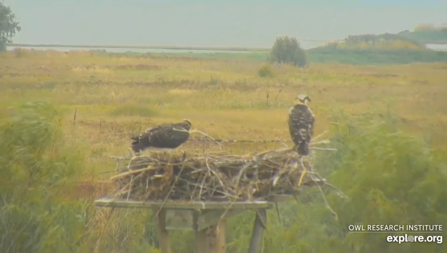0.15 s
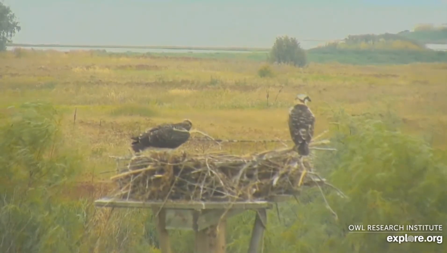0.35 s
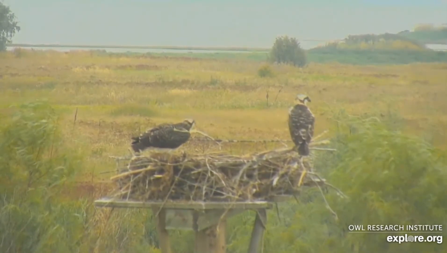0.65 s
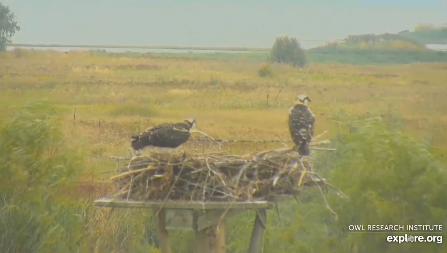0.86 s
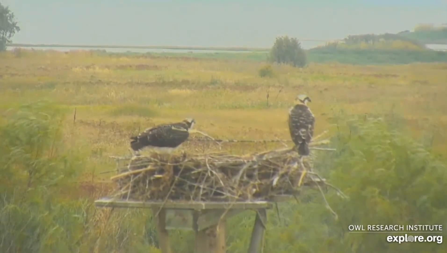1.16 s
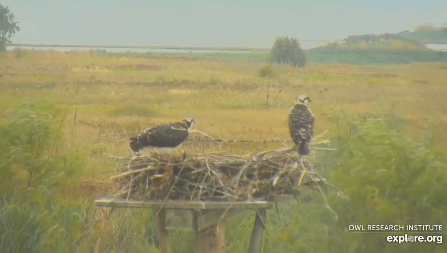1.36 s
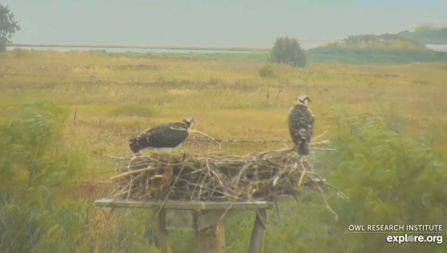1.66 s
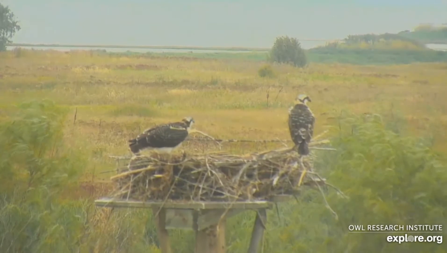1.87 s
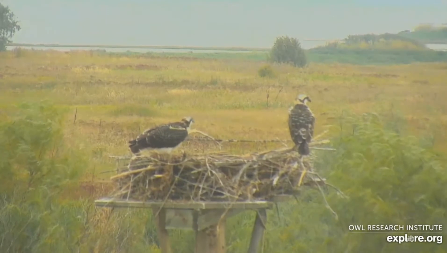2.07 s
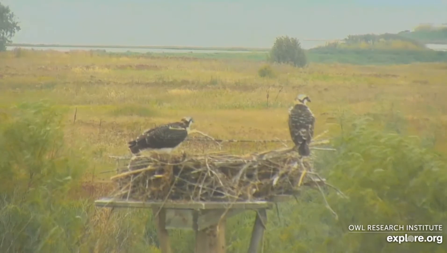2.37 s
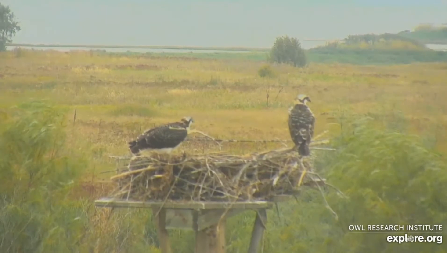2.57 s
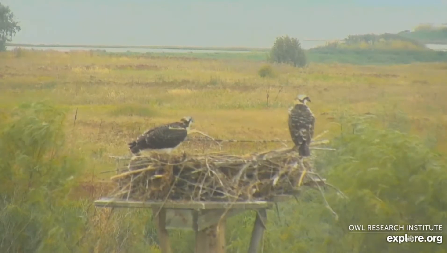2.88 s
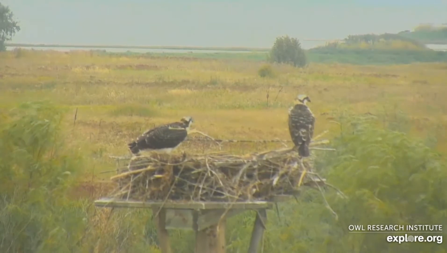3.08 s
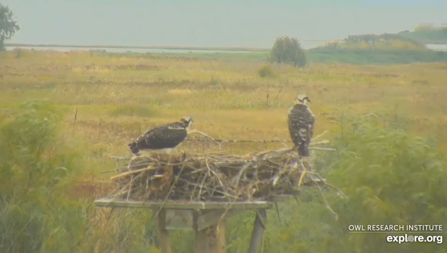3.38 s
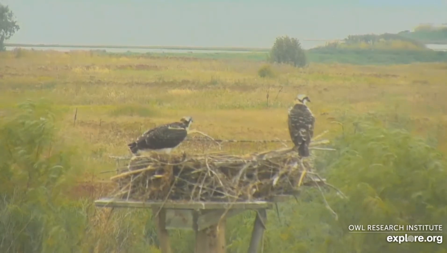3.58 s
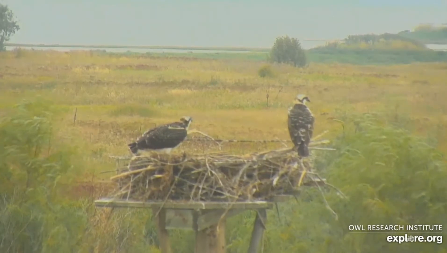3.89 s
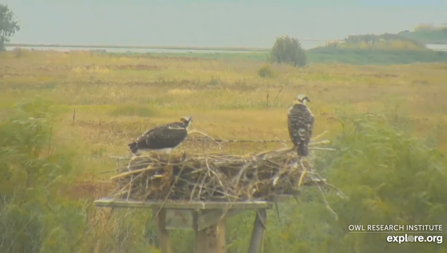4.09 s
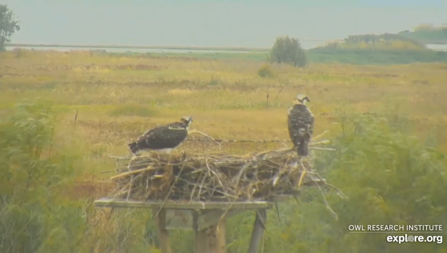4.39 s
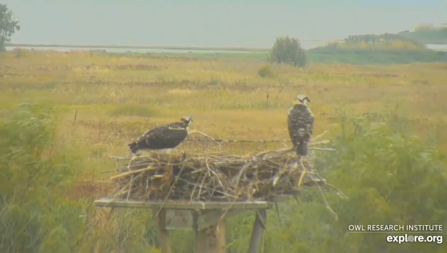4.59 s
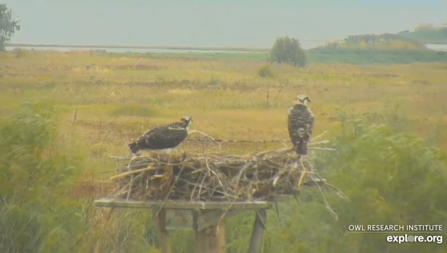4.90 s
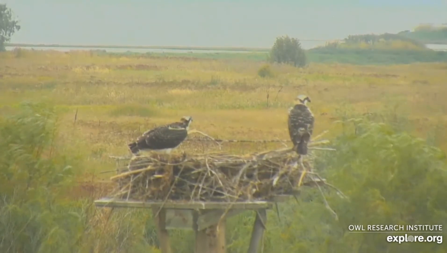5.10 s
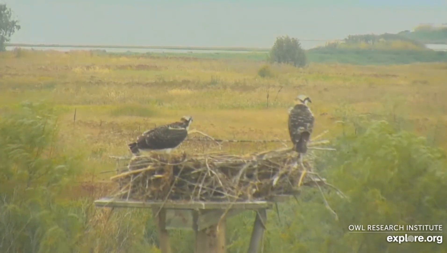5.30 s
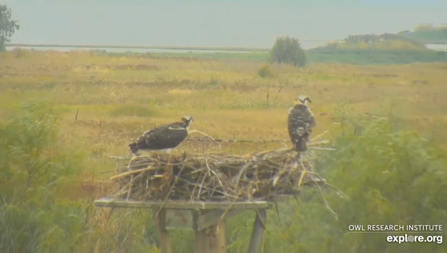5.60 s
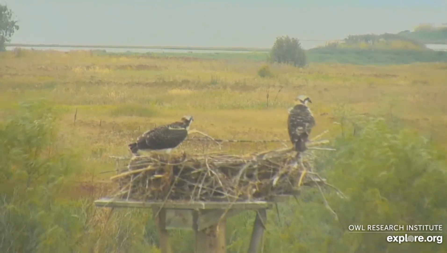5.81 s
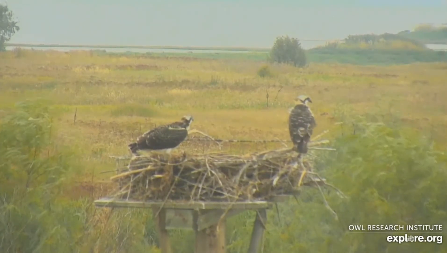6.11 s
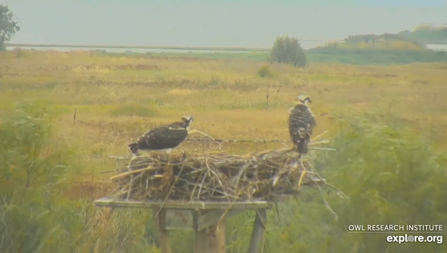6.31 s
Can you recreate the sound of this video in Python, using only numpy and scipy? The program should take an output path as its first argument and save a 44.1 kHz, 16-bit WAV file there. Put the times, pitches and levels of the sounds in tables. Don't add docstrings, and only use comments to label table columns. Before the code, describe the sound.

Birds at an open marsh nest trade brief gliding whistles over soft wind buffeting, grass hiss and a deep, slowly swelling engine hum.

```python
import sys
import numpy as np
from scipy import signal
from scipy.fft import rfft, irfft
from scipy.io import wavfile
from scipy.ndimage import uniform_filter1d

SR = 44100
rng = np.random.default_rng(int(sys.argv[2]) if len(sys.argv) > 2 else 0)


def int16_out(signal):
    q = np.round(np.clip(np.atleast_2d(signal).T, -1, 1) * 32767)
    wavfile.write(sys.argv[1], SR, q.astype(np.int16))


def volts_from_db(level):
    exponent = np.asarray(level, float) / 20
    return 10 ** exponent


N = 284445
TIME = np.arange(N) / SR


# (lag [ms], level [dB])
ECHOES = [(9, -21), (17, -22), (31, -25), (64, -25)]
# (multiple [1], level [dB])
OVERTONES = [(2, -31), (3, -34.5)]


def sing(shape, calls, rough=.1, split_hz=0):
    out = np.zeros(N)
    ms, hz, db = np.transpose(shape)
    ms = np.maximum.accumulate(ms)
    for s, call_db, pitch, bright_db_per_khz, stretch in calls:
        echo_db = .33 * max(-29 - call_db, 0)
        t = np.arange(ms[0], ms[-1], 1000 / SR / stretch)
        f = uniform_filter1d(np.interp(t, ms, hz) * pitch, size=54)
        flutter = uniform_filter1d(rng.standard_normal((2, len(t))), 40, axis=1) * np.sqrt(40)
        phase = 2 * np.pi * np.cumsum(f * (1 + .045 * rough * flutter[0])) / SR
        tone = np.sin(phase)
        for k, d in OVERTONES:
            tone = tone + volts_from_db(d) * np.sin(k * phase) * (k * f < SR / 2)
        level_db = call_db + np.interp(t, ms, db) + bright_db_per_khz * (f - 3500) / 1000
        gain = volts_from_db(level_db) * signal.windows.tukey(len(t), .06)
        beat = np.cos(np.pi * split_hz * np.arange(len(t)) / SR)
        chirp = np.sqrt(2) * tone * gain * (1 + rough * flutter[1]) * beat
        start = s + ms[0] * stretch / 1000
        add(out, chirp, start)
        for lag_ms, d in ECHOES:
            add(out, chirp * volts_from_db(d + echo_db), start + lag_ms / 1000)
        tail_t = np.arange(SR // 8) / SR
        tail = rng.standard_normal(len(tail_t)) * np.exp(-tail_t / .045)
        add(out, signal.fftconvolve(chirp, tail) * volts_from_db(-45.5 + echo_db), start)
    return out


def quaver(shape, count):
    swing_hz, swing_ms, fade_db = (3380, 2680), 4.9, -3
    ms, _, db = shape[-1]
    swings = [(ms + k * swing_ms, swing_hz[1 - k % 2], db + k * fade_db) for k in range(1, count + 1)]
    return list(shape) + swings


def openings(calls):
    return [(s, db, pitch, bright, 1) for s, db, pitch, bright, _ in calls]


def closings(calls, after_ms):
    return [(s + after_ms / 1000, arch_db, pitch, 0, 1) for s, _, pitch, _, arch_db in calls]


# (time [ms], pitch [Hz], level [dB])
LEAD_IN = [(-28, 4900, -30), (-24, 5000, -17), (-10, 5350, -14), (-2, 5800, -12), (2, 6000, -30)]


def lead_in(calls):
    return sing(LEAD_IN, openings(calls), rough=.35, split_hz=680)


# (time [ms], pitch [Hz], level [dB])
WARBLE = [(0, 3450, -17), (7, 4560, -4.5), (14, 4860, -.3), (19, 4480, -2.5), (26.5, 4880, -4),
          (33, 3640, -1.5), (43, 3600, -.2), (48.5, 4650, -7), (56, 2950, -17)]
# (time [ms], pitch [Hz], level [dB])
ARCH = [(.1, 3230, -24), (1.8, 3010, -11), (8.64, 3270, 0), (16.6, 3660, -7.5), (23.5, 3700, -6.5),
        (29.05, 3150, -8.5), (34.43, 2980, -4.5)]
# (time [s], level [dB], pitch factor [1], brightness [dB per kHz], closing arch level [dB])
NEAR_CALLS = [
    (.1078, -27.5, .995, 0, -28),
    (1.3303, -27.5, 1, 0, -28),
    (2.4631, -30, .995, 0, -30),
    (3.7881, -29.5, .987, 0, -30.5),
    (4.8308, -26, 1, 0, -27),
    (6.0230, -28, 1, 1, -31),
]


def near_sparrow():
    warble = sing(WARBLE, openings(NEAR_CALLS), rough=.16)
    arch = sing(quaver(ARCH, count=6), closings(NEAR_CALLS, after_ms=55.9), rough=.18)
    return lead_in(NEAR_CALLS) + warble + arch


# (time [ms], pitch [Hz], level [dB])
SHARP = [(-2, 3300, -22), (4.5, 4180, -3), (10, 5170, -4), (17, 4950, -4), (23, 5400, -7), (34.5, 3620, -2),
         (41, 4360, -4), (45, 3800, -8), (50, 3050, -12)]
# (time [ms], pitch [Hz], level [dB])
SHARP_ARCH = [(0.099, 2600, -16), (5.4, 3330, -7), (18.6, 3680, 0.3), (30.6, 4010, -6.5), (38.3, 3500, -6),
              (47, 3300, -14)]
# (time [s], level [dB], pitch factor [1], brightness [dB per kHz], closing arch level [dB])
SHARP_CALLS = [
    (.7180, -32, 1, 0, -36),
    (2.6175, -37, 1, -5, -37.5),
    (4.0330, -42, 1.02, -1, -42),
    (5.6485, -44, 1.01, 1, -58),
]


def sharp_sparrow():
    warble = sing(SHARP, openings(SHARP_CALLS), rough=.18)
    arch = sing(SHARP_ARCH, closings(SHARP_CALLS, after_ms=48.7), rough=.18)
    return lead_in(SHARP_CALLS) + warble + arch


# (time [ms], pitch [Hz], level [dB])
HOARSE_LOW = [(0, 3500, -10), (15, 4250, -1), (25, 3550, -2), (42, 3400, -2), (58, 2950, -5),
              (64, 3000, -5)]
HOARSE_HIGH = [(-14, 6200, -14), (-2, 5450, -11), (8, 4950, -9), (17, 4950, -3), (25, 4150, -4),
               (50, 4080, -7), (62, 3900, -22), (94, 3850, -9), (104, 3600, -22)]
HOARSE_ARCH = [(64, 3000, -5), (76, 3250, 0), (84, 3950, -1), (92, 3100, -1), (105, 2850, -3),
               (125, 2720, -7), (132, 2700, -25)]
# (time [s], level [dB], pitch factor [1], brightness [dB per kHz], length factor [1])
HOARSE_CALLS = [
    (3.246, -37, .985, -3, .91),
    (5.394, -37, 1, 0, .97),
]


def hoarse_sparrow():
    low = sing(HOARSE_LOW, HOARSE_CALLS, rough=.5, split_hz=80)
    arch = sing(HOARSE_ARCH, HOARSE_CALLS, rough=.5, split_hz=80)
    return low + arch + sing(HOARSE_HIGH, HOARSE_CALLS, rough=.6)


# (time [ms], pitch [Hz], level [dB])
FAR = [(-55, 3400, -24), (-44, 4750, -19), (-30, 4400, -20), (-25, 4400, -13), (-21, 3400, -16),
       (-16, 3300, -24), (-11, 3600, -10), (-6, 3000, -18)]
# (time [ms], pitch [Hz], level [dB])
FAR_ARCH = [(-7, 3000, -15), (1.6, 2800, -7), (6.5, 3480, -1), (22.5, 3330, -3), (32, 2800, -4.5),
            (36.5, 2600, -3.5)]
# (time [s], level [dB], pitch factor [1], brightness [dB per kHz], length factor [1])
FAR_CALLS = [
    (1.025, -36.5, 1.001, 4, 1.04),
    (2.968, -41, 0.97, 7, 1.001),
    (4.266, -46, .97, 0, 1.001),
    (5.14, -41, 1, 7, 1.1),
]


def far_sparrow():
    return sing(FAR, FAR_CALLS, rough=.55) + sing(quaver(FAR_ARCH, count=4), FAR_CALLS, rough=.25)


# (time [ms], pitch [Hz], level [dB])
SLIDE = [(0, 2650, -14), (8, 2750, -3), (26, 3080, 0), (34, 3120, -14)]
# (time [s], level [dB], pitch factor [1], length factor [1])
SLIDE_CALLS = [
    (.697, -43, 2.03, .6),
    (.905, -54, 1.6, .8),
    (1.735, -50, 1.12, .9),
    (2.925, -46, 1, 1),
    (3.008, -48, 1.1, .4),
    (3.113, -44.5, 1, 1.05),
    (5.1, -41, 1.36, .4),
    (5.105, -53, 1.75, .8),
    (5.118, -43, 1.14, 1),
]


def sliding_notes():
    calls = [(s, db, pitch, 0, stretch) for s, db, pitch, stretch in SLIDE_CALLS]
    return sing(SLIDE, calls, rough=.21)


# (time [s], pitch [Hz], level [dB])
PEEP = [
    (.12, 1970, -75),
    (.15, 1980, -58),
    (.27, 1975, -61),
    (.32, 1970, -75),
]


def peep():
    hz, db = curves(PEEP)
    return np.sqrt(2) * volts_from_db(db) * np.sin(2 * np.pi * np.cumsum(hz) / SR)


def sparrows():
    near = near_sparrow() + sharp_sparrow()
    return near + hoarse_sparrow() + far_sparrow() + sliding_notes() + peep()


# (start [s], end [s], start of one stroke [s], stroke rate [Hz], level [dB])
TRILLS = [
    (0, .68, .413, 40.8, -54),
    (1.42, 2.4, 1.6, 39.05, -48.5),
]


def cricket():
    out = 0
    for start, end, stroke_s, rate, db in TRILLS:
        stroke = (TIME - stroke_s) * rate % 1
        hz = 4160 - 720 * stroke
        swell = np.sin(np.pi * np.clip((TIME - start) / (end - start), 0, 1) ** .6) ** .6
        pulse = np.sin(np.pi * np.clip(stroke / .55, 0, 1))
        gain = swell * pulse * volts_from_db(db + 1.2 * walk(30))
        out = out + gain * np.sin(2 * np.pi * np.cumsum(hz) / SR)
    return out


# (time [s], level [dB], pitch [Hz])
TICKS = [
    (.833, -44, 4200),
    (1.668, -36, 7000),
    (2.93, -44, 7000),
    (4.728, -42, 11500),
]


def twigs():
    out, t = np.zeros(N), np.arange(60) / SR
    for s, db, hz in TICKS:
        add(out, volts_from_db(db) * np.sin(2 * np.pi * hz * t) * np.exp(-t / .0002), s)
    return out


# (time [s], thump level [dB], half length [s], sharpness [dB])
GUST = [(0.0, -42.5, 0.069, -9), (0.248, -34.5, 0.041, -20), (0.584, -39.5, 0.022, 0),
        (0.733, -35, 0.12, -26), (0.947, -40, 0.092, -22), (1.085, -34.5, 0.13, -23),
        (1.22, -34.5, 0.1, -17), (1.386, -35, .05, -15), (1.534, -35, 0.067, -23),
        (1.719, -29.5, 0.07, -18), (1.932, -41, 0.06, -17), (2.338, -33, 0.041, -7.5),
        (2.41, -38, 0.063, -2.5), (2.57, -36, 0.079, -6), (2.673, -32.5, 0.078, -13), (3.016, -40, 0.2, -8),
        (3.17, -35.5, .03, -2), (3.292, -46, 0.033, -5), (3.52, -40, 0.091, -14), (3.694, -44.5, 0.13, -13),
        (3.99, -40, 0.028, -12), (4.22, -48, .05, 2), (4.68, -46.5, 0.17, -1), (4.93, -37.5, 0.026, -11),
        (5.05, -46, .05, 0), (5.47, -48, .06, -10), (5.73, -53, 0.054, -7), (6.0, -44.5, 0.11, 3),
        (6.296, -58, 0.035, -4), (6.45, -48, 0.034, -13)]
# (frequency [Hz], level [dB per Hz])
BUFFET = [(22, -34), (40, -18), (62, -7.5), (90, -2), (130, 1), (170, -1), (230, -6), (330, -17),
          (600, -40)]
# (frequency [Hz], level [dB per Hz])
EDGE = [(150, -37), (220, -12.5), (280, -2), (350, -9.5), (500, -40)]


def wind():
    _, db, _, sharp_db = np.transpose(GUST)
    swell = bumps(GUST) ** 2
    lull_db, lull_edge_db = -45 - 1.18 * TIME, -47.5
    thump = np.sqrt(volts_from_db(db) ** 2 @ swell + volts_from_db(lull_db) ** 2)
    sharp = np.sqrt(volts_from_db(db + sharp_db) ** 2 @ swell + volts_from_db(lull_edge_db) ** 2)
    puffs = coloured(BUFFET, 128, 240, flicker_db=1.5, rate=30)
    edge = coloured(EDGE, 197, 400, flicker_db=0.0, rate=14) * volts_from_db(-5.0)
    return (puffs * thump + edge * sharp) * volts_from_db(-1.5 + 1.2 * walk(45))


# (time [s], level [dB])
DRONE = [
    (0.0, -32),
    (1.0, -33),
    (2.3, -33),
    (3.15, -27.5),
    (4.3, -26),
    (5.5, -23.5),
    (6.45, -22),
]
# (time [s], change [dB], half length [s])
FADES = [
    (0.544, -10.5, 0.065),
    (0.814, -7.5, 0.11),
    (1.085, -11, 0.034),
    (1.4, -10, .2),
    (1.613, 1, 0.054),
    (1.837, -7, 0.033),
    (2.02, -2.5, .09),
    (2.417, -4.5, .08),
    (3.383, -2, 0.055),
]
# (multiple [1], level [dB])
DRONE_ORDERS = [(12, -67), (16, -67.5), (22, -68)]


def engine():
    firing_hz = 110.75
    db = curves(DRONE)[0] + np.array(FADES)[:, 1] @ bumps(FADES)
    phase = 2 * np.pi * np.cumsum(firing_hz + .25 * walk(2)) / SR
    upper = sum(volts_from_db(d + 2.0 * walk(3.33)) * np.sin(k * phase) for k, d in DRONE_ORDERS)
    return np.sqrt(2) * (volts_from_db(db + .7 * walk(9)) * np.sin(phase) + upper)


# (frequency [Hz], level [dB per Hz])
ROAR = [(25, -13), (45, -19), (80, 7), (140, 2), (190, -7), (430, 0.5), (620, -2), (870, -4.5),
        (1480, -16.5), (2400, -19.5), (3100, -24), (5000, -64)]
# (time [s], level [dB])
ROAR_LEVEL = [(0.0, -44), (1.2, -43), (2.9, -42), (5.2, -41.5), (5.75, -43), (6.45, -42.5)]
# (frequency [Hz], level [dB per Hz])
HISS = [(710, -40), (1200, -9), (1420, -4.5), (1770, -1.5), (1940, -8), (2230, -7), (2770, -0.5),
        (3660, -2.5), (4630, -1.5), (8620, -10.5), (12200, -22.5), (14700, -26), (15600, -25)]
# (time [s], level [dB])
BREEZE = [(0.0, -59.5), (.77, -57.5), (1.22, -59), (1.51, -58), (2.1, -59.5), (3.0, -56), (3.32, -55.5),
          (3.81, -52.5), (4.44, -54), (5.21, -52.5), (6.45, -52.5)]
# (frequency [Hz], level [dB per Hz])
SELF_NOISE = [(3000, 7.5), (6000, -1), (9000, -5), (12000, -3.5), (14500, -5), (15700, -7)]


def marsh():
    roar_db, hiss_db = curves(ROAR_LEVEL)[0], curves(BREEZE)[0]
    roar = coloured(ROAR, 300, 1500, flicker_db=.5, rate=5) * volts_from_db(roar_db)
    hiss = coloured(HISS, 6000, 10000, flicker_db=.3, rate=6) * volts_from_db(hiss_db - 1.5)
    amplifier = coloured(SELF_NOISE, 10000, 15500, flicker_db=1.0, rate=4.7) * volts_from_db(-66)
    return roar + hiss + amplifier


def curves(table):
    s, *columns = np.transpose(table)
    return [np.interp(TIME, s, c) for c in columns]


def bumps(table):
    s, half_s = np.array(table)[:, [0, 2]].T[..., None]
    return np.exp(-((TIME - s) / half_s) ** 2)


def walk(rate):
    hold = int(SR / rate)
    levels = np.repeat(rng.standard_normal(N // hold + 1), hold)[:N]
    levels = uniform_filter1d(uniform_filter1d(levels, hold), hold)
    return levels / levels.std()


def coloured(spectrum, lo_hz, hi_hz, flicker_db, rate):
    hz = np.maximum(np.arange(N // 2 + 1) * SR / N, 1)
    at, db = np.transpose(spectrum)
    noise = rfft(rng.standard_normal(N)) * volts_from_db(np.interp(np.log(hz), np.log(at), db))
    inside = noise[(hz > lo_hz) & (hz < hi_hz)]
    noise = noise / np.sqrt(2 * np.sum(np.abs(inside) ** 2)) * N
    half_octave = 2 * np.log2(hz)
    out = 0
    for centre in np.arange(np.floor(2 * np.log2(at[0])), 2 * np.log2(at[-1]) + 1):
        share = np.cos(np.pi / 2 * np.clip(half_octave - centre, -1, 1)) ** 2
        out = out + irfft(noise * share, N) * volts_from_db(flicker_db * walk(rate))
    return out


def add(out, x, s):
    i = int(s * SR)
    out[i:i + len(x)] += x[:N - i]


def scene():
    return (sparrows() + cricket() + twigs() + wind() + engine() + marsh())[None]


def top_cut(x):
    return signal.sosfilt(signal.butter(12, 15700, fs=SR, output="sos"), x)


def record(dry):
    return top_cut(dry)


dry = scene()
out = record(dry)
int16_out(out)
```